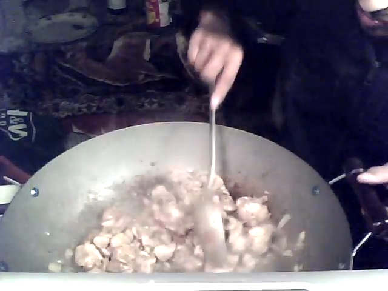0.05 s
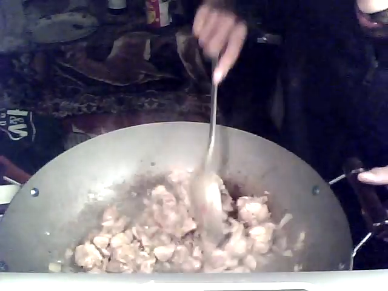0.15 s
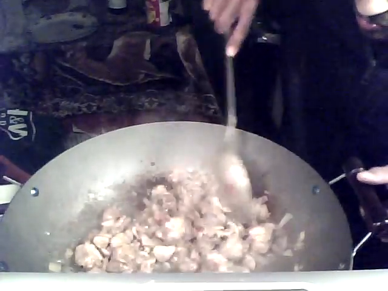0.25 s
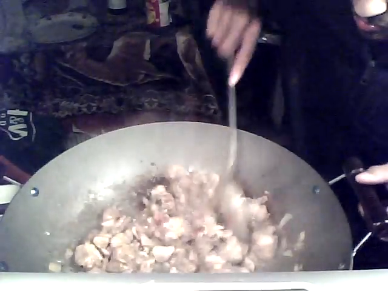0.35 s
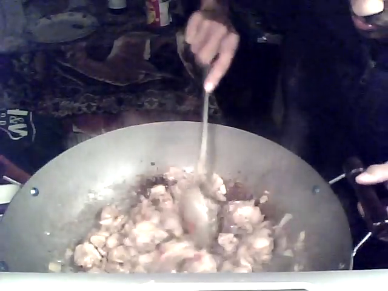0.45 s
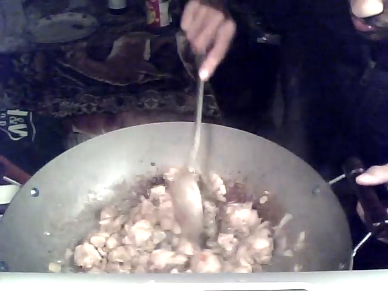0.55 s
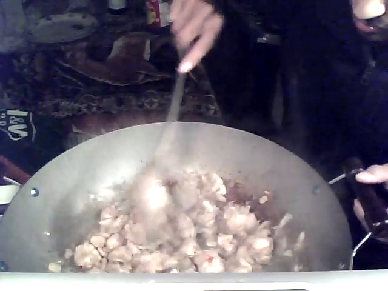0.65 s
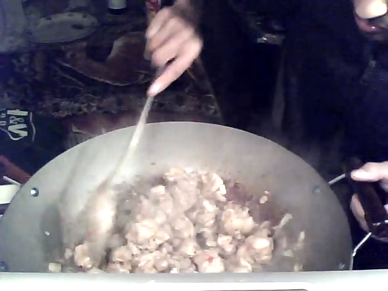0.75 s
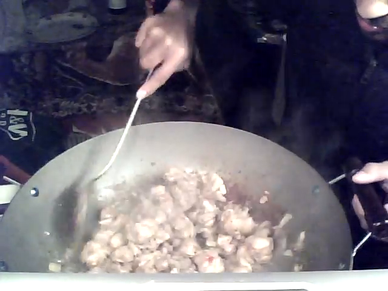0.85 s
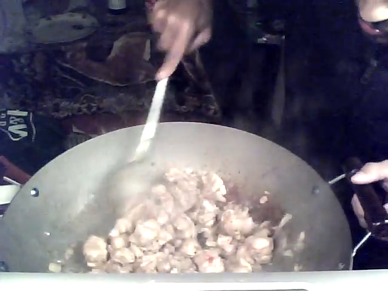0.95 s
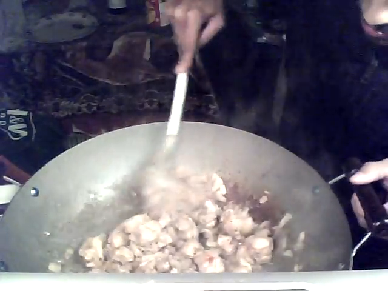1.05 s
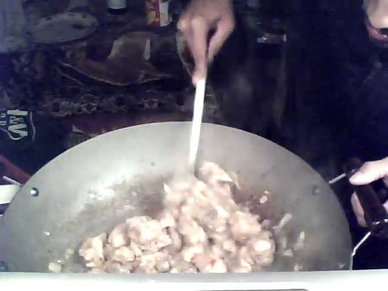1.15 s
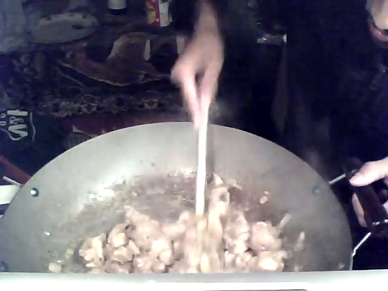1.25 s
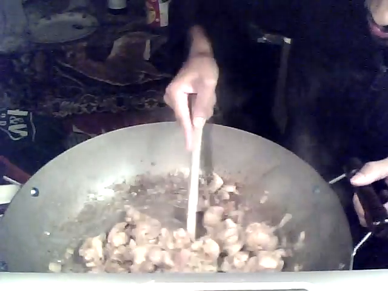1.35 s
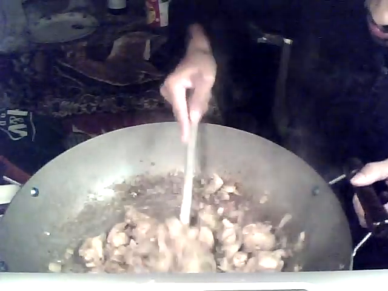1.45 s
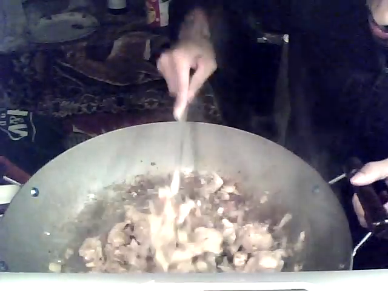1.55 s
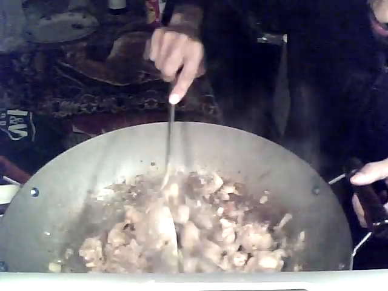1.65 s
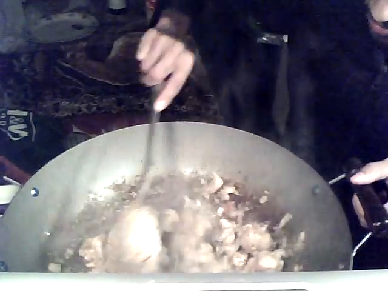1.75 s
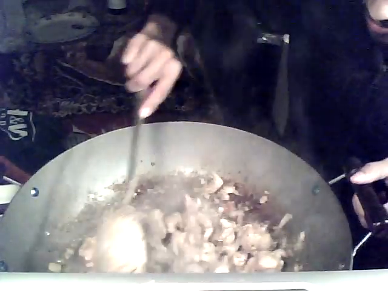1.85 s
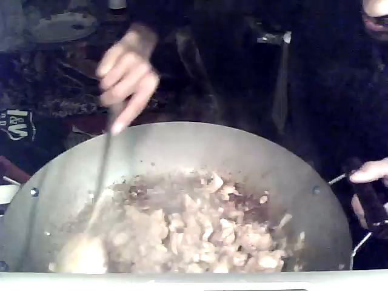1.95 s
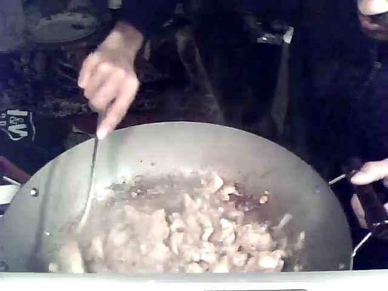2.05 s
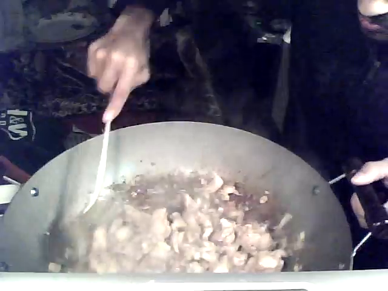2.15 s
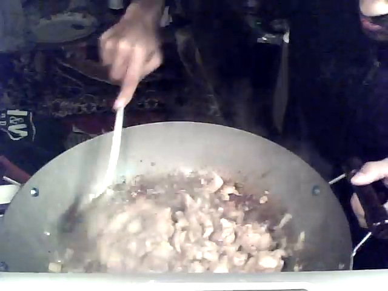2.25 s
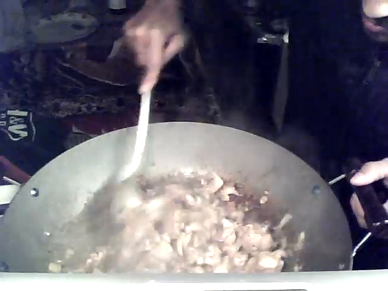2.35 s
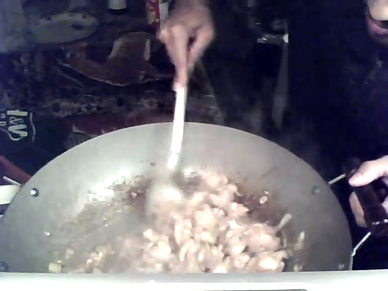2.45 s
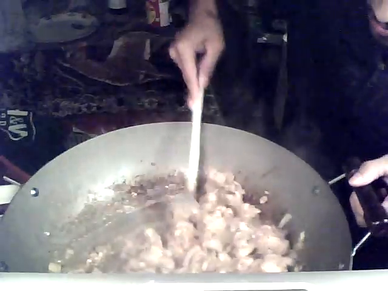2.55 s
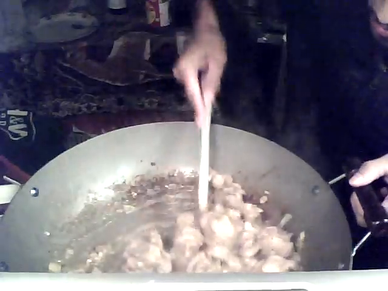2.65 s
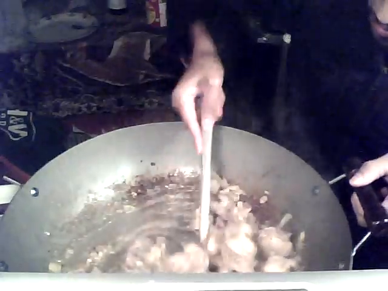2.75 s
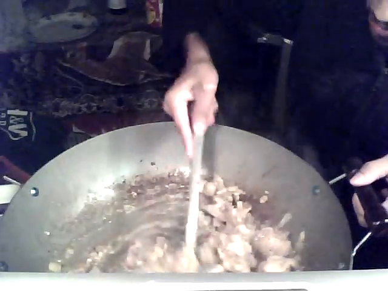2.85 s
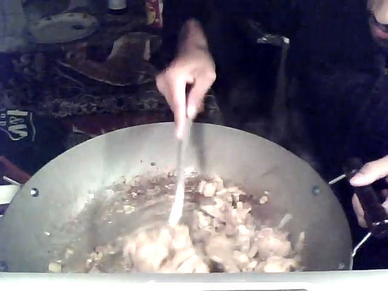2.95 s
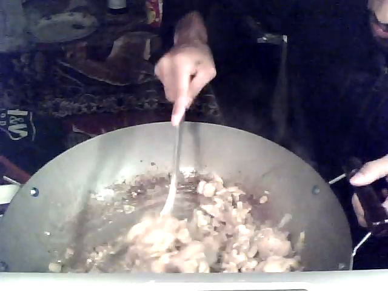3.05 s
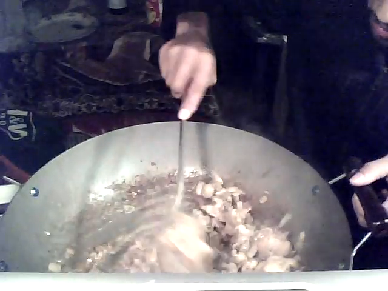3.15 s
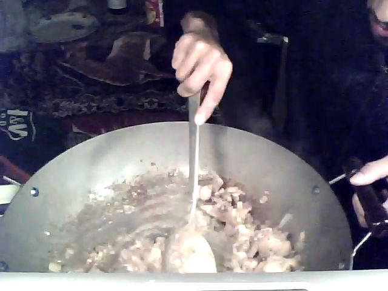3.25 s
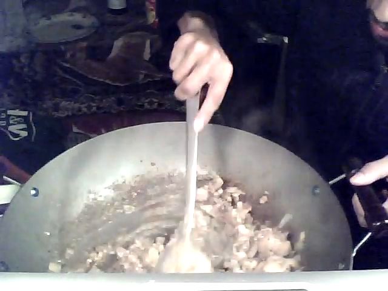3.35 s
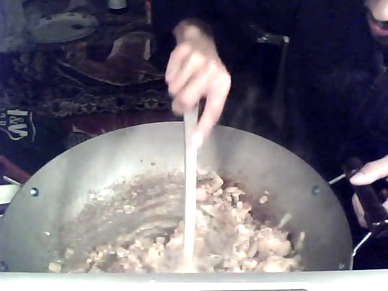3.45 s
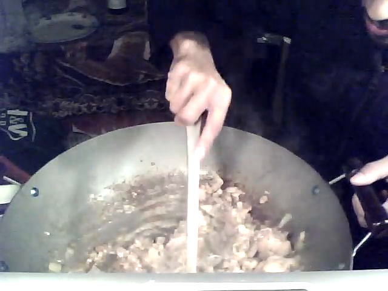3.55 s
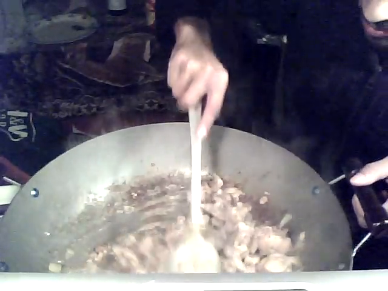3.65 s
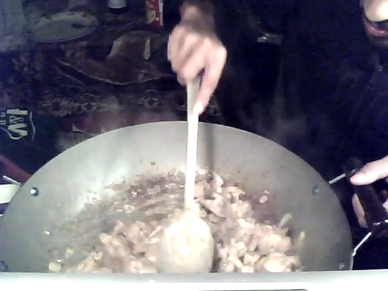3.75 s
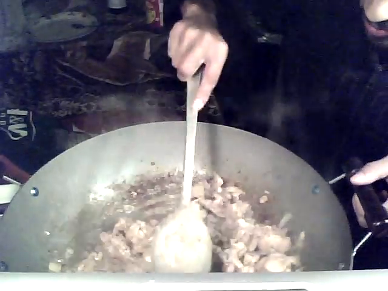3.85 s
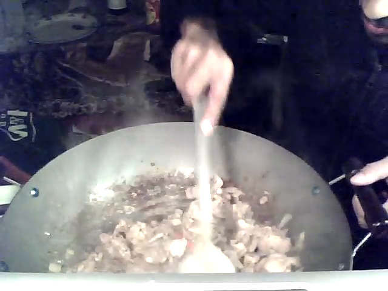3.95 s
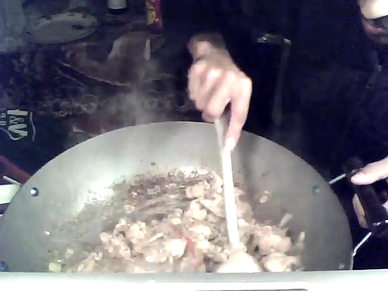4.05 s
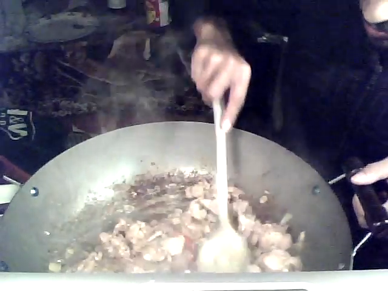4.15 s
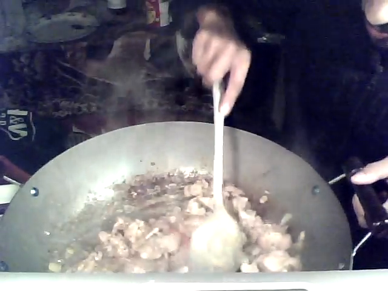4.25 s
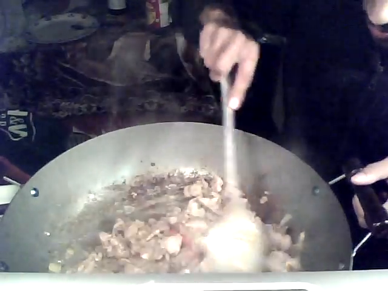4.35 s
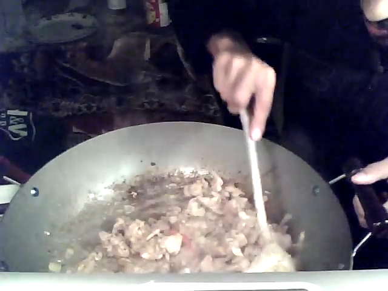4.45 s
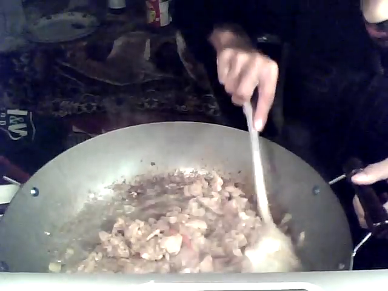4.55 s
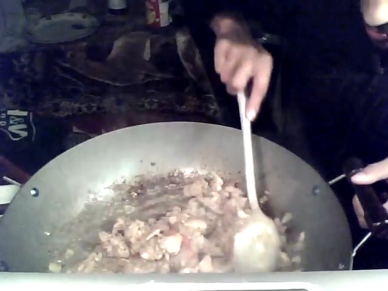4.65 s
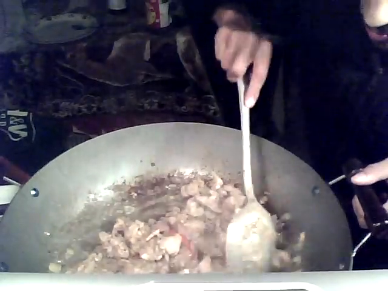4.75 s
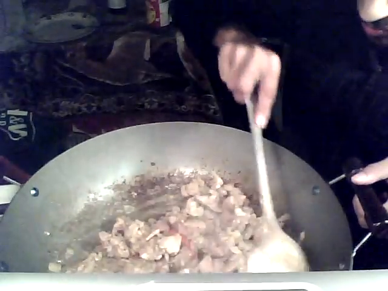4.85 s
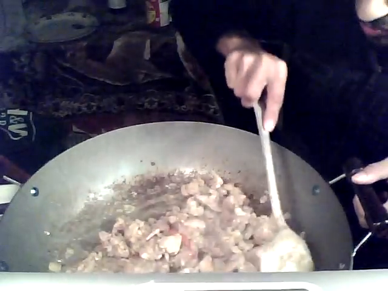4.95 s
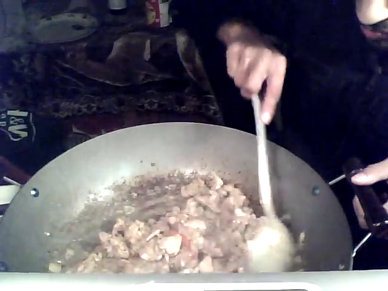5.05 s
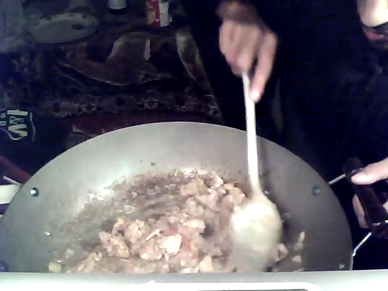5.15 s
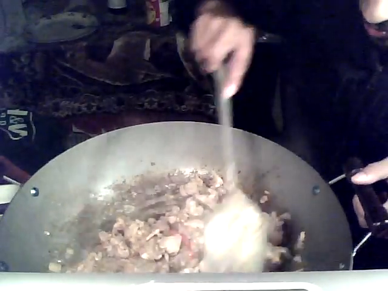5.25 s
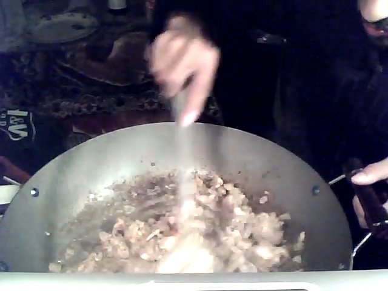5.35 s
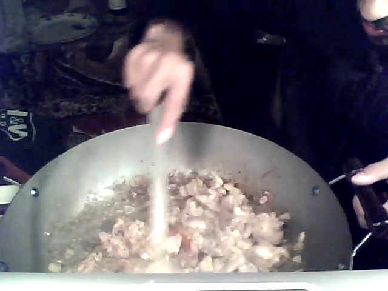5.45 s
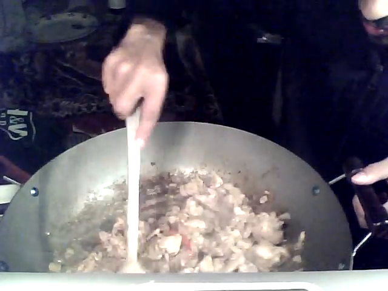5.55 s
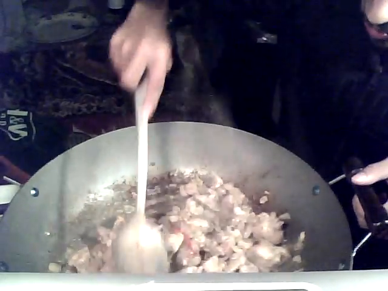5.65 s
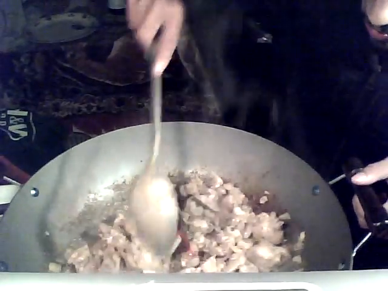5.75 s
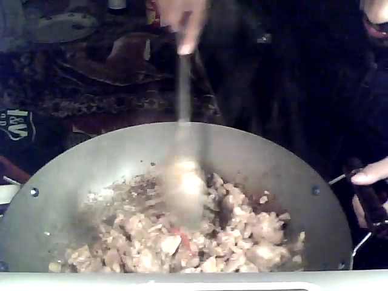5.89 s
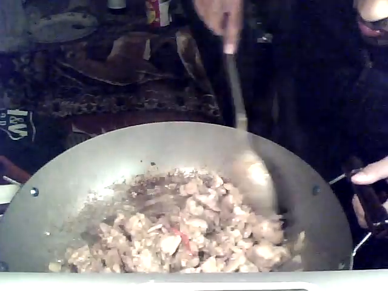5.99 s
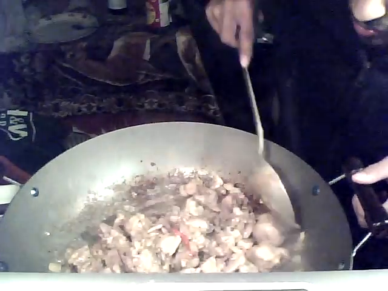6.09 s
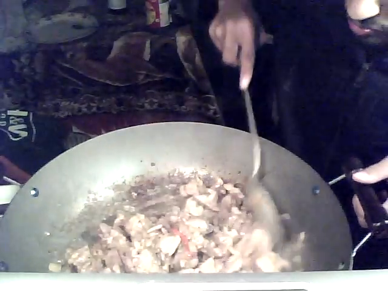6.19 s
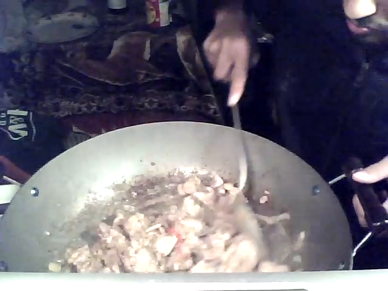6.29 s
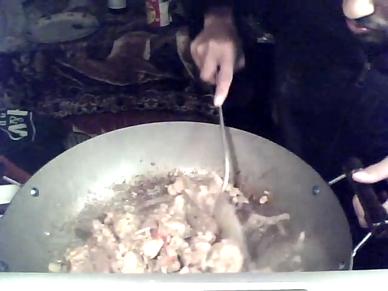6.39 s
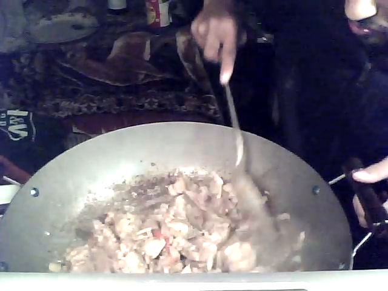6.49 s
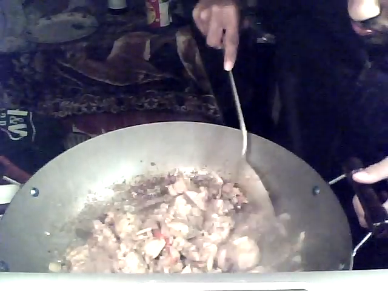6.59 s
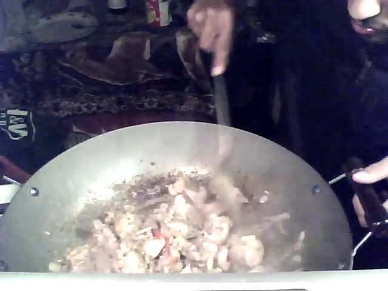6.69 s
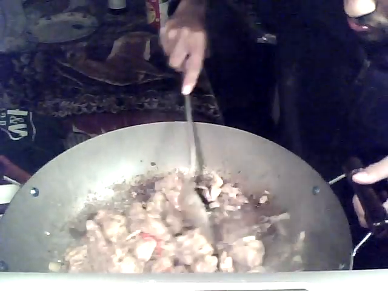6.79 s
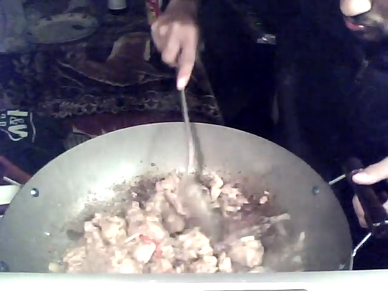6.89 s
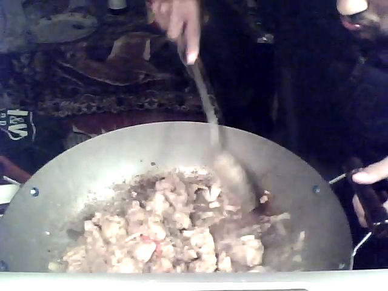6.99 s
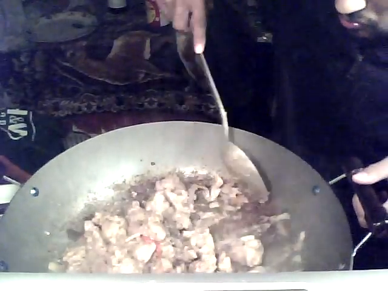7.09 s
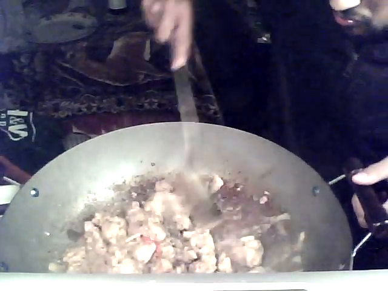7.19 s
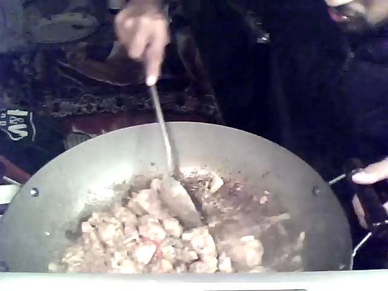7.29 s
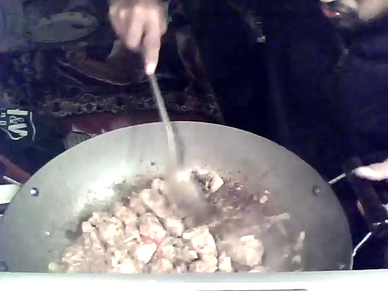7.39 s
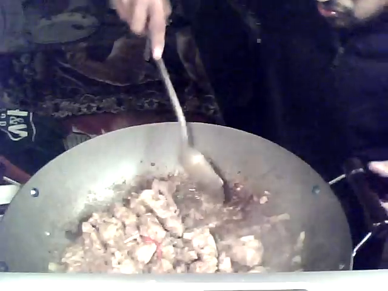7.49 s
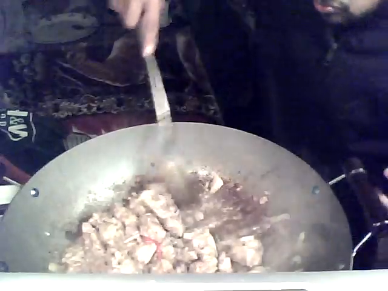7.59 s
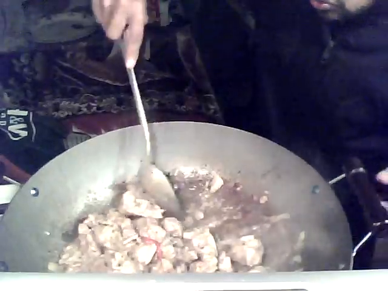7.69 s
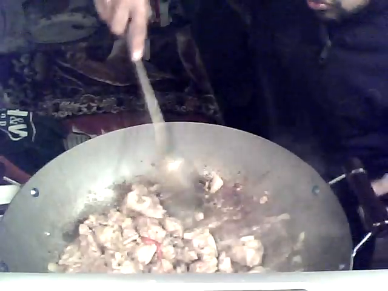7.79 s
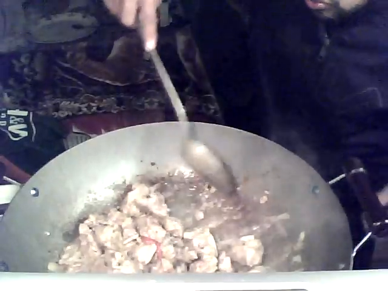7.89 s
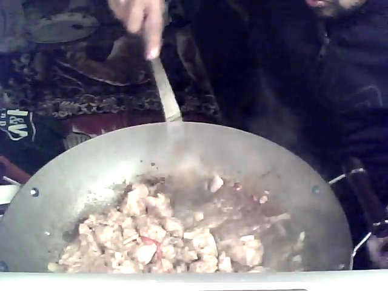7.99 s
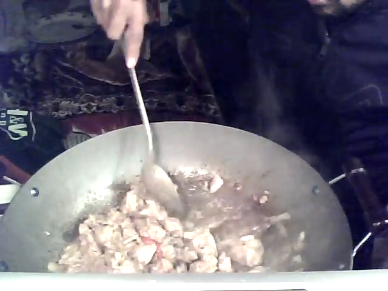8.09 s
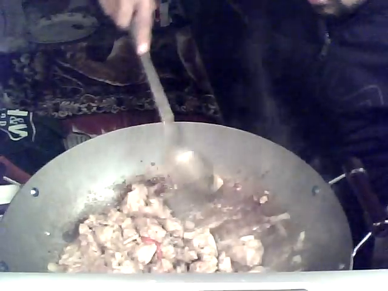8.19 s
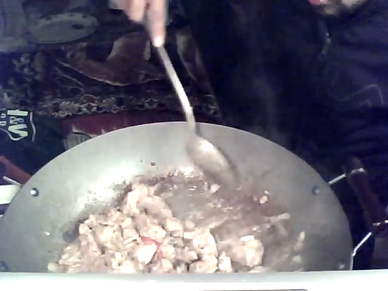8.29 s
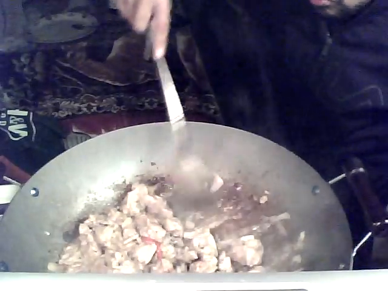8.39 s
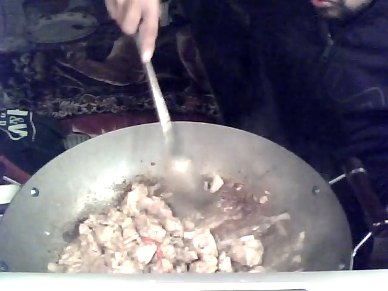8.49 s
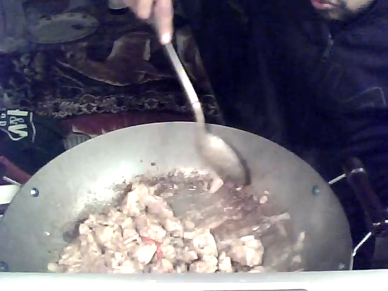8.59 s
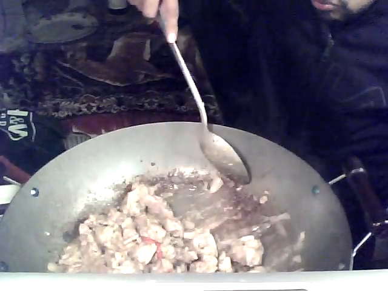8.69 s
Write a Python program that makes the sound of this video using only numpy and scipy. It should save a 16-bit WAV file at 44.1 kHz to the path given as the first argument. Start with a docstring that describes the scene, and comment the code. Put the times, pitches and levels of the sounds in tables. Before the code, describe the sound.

A metal spoon stirs meat in a steel wok. A short scrape and brief clanks with gritty strokes come first over a thin steady whine, which stops before the middle. Soft, moist pats follow, then widely spaced, very hard clangs that ring and distort. Softer pushes and a quick flurry of knocks end it. Faint sizzle comes in wisps. Short kitchen echo, dull narrow microphone.

```python
"""A metal spoon stirs meat in a steel wok, heard through a small, dull-sounding microphone in a kitchen.
A short scrape leads to clanks that ring the wok and spoon; edge catches make each stroke grate.
Up to about 3.4 s a thin whine is heard; then soft pushes pat the meat on the steel and rock the wok.
From about 4 to 6.4 s the hardest clanks come, some overloading the recorder, over wavering narrow tones.
Pushes and a last flurry of knocks follow. A noise suppressor thins the sizzle of bubbles to wisps."""
import sys
import numpy as np
from scipy import signal
from scipy.io import wavfile
from scipy.ndimage import uniform_filter1d

SR = 44100
rng = np.random.default_rng(int(sys.argv[2]) if len(sys.argv) > 2 else 0)


def transcribe(signal):
    """Save signal, clipped to [-1, 1], as a 16-bit WAV file at the path in sys.argv[1]."""
    frames = np.atleast_2d(signal).T
    limited = np.clip(frames, -1, 1)
    pcm = np.round(limited * 32767).astype(np.int16)
    wavfile.write(sys.argv[1], SR, pcm)


N = 384993
TIME = np.arange(N) / SR

# spoon landings: start_s, low_clank_peak_db, mid_ring_db (against the low clank),
# bright_ring_db (against the low clank), spoon_ring_db (against the bright ring),
# clank_centre_hz, mid_centre_hz, spoon_centre_hz
SPOON_LANDINGS = [(0.44, -20, 3, -4.5, -30, 1060, 1850, 4600),
                  (0.968, -8, -0.5, -5, -12.5, 650, 1560, 3350),
                  (0.975, -24.5, 4.5, -7.5, -19.5, 966, 2610, 3350),
                  (1.185, -21.5, 1, -12.5, -20, 563, 1750, 3000),
                  (1.217, -14, -19, -19.5, -20.5, 516, 2580, 3000),
                  (1.321, -19.5, -5, -21, -16, 1250, 1500, 3000),
                  (1.433, -32, 4, -15.5, -2, 1000, 2270, 3500),
                  (2.359, -19.5, -9.5, -7, -19, 700, 2390, 3400),
                  (2.412, -26.5, -3, -3.5, -18, 620, 2400, 3350),
                  (2.43, -19, -14.5, -7.5, -21.5, 600, 2300, 3350),
                  (2.528, -18, 0.5, -16, -6, 600, 2570, 2950),
                  (2.552, -26, 6.5, -6, -13.5, 950, 2630, 2950),
                  (3.714, -28.5, -2.5, -3, -15, 410, 2264, 3750),
                  (4.172, -4.5, -2.5, -14, -14, 1090, 1570, 3800),
                  (4.614, -10.5, -7.5, -7, -9.5, 950, 2450, 3500),
                  (5.051, -10, -10.5, -4, -3.5, 1046, 2600, 3500),
                  (5.283, -38, 5, -3.5, -15, 500, 1920, 3650),
                  (5.665, -5, -2.5, -15, -13, 1077, 1526, 3000),
                  (6.223, -33.5, 5.5, -19.5, -14.5, 1210, 1586, 3300),
                  (6.327, -7, 6, -3, -10, 1090, 1750, 3330), (6.634, -18, 5.5, -6.5, -19, 600, 2360, 3000),
                  (6.672, -34.5, 10, -1.5, -10.5, 1110, 2300, 3300),
                  (7.246, -13.5, 2, -8.5, -17, 950, 1790, 3300),
                  (7.291, -26, -12, -1, -26, 510, 1800, 4200),
                  (7.342, -23, -13.5, -10.5, -16, 506, 1800, 4200),
                  (8.143, -33, -15.5, -24.5, -16, 433, 1750, 3400),
                  (8.167, -21.5, -16.5, -18, -18.5, 493, 2450, 3400),
                  (8.179, -18.5, -7.5, -3, -31.5, 604, 2450, 3450),
                  (8.53, -17, -8, -24, -16, 560, 1735, 3000),
                  (8.551, -24, -17.5, -19.5, -12, 680, 1725, 3000),
                  (8.59, -22, 0.5, -15.5, -12, 1130, 1790, 3000),
                  (8.6, -30.5, 1.5, -5.5, -19, 1110, 1830, 3500)]
# scraping strokes: start_s, length_s, halfway_level_db, swell_over_stroke_db, bright_rasp_share_db,
# start_resonance_hz, end_resonance_hz, rocking_db (before the rumble's own level)
SCRAPING_STROKES = [(0.105, 0.041, -15, 5, -8, 2355, 1840, -35.5),
                    (0.986, 0.13, -27.5, 16.5, -2, 3446, 3300, -27.5),
                    (1.18, 0.083, -23.5, 3, -5.5, 2930, 2600, -40),
                    (1.264, 0.07, -22, 5, -15, 1007, 1310, -47),
                    (1.346, 0.064, -31, -3.5, -7, 1354, 1176, -48.5),
                    (1.434, 0.031, -30.5, 4, -5, 2077, 2300, -57),
                    (2.368, 0.07, -29, -4.5, -2, 2400, 2600, -31.5),
                    (2.452, 0.059, -38, 2.5, -9, 620, 580, -32.5),
                    (2.531, 0.12, -22, 3.5, -14.5, 587, 1160, -39.5),
                    (2.669, 0.15, -32, -5, -9, 1350, 1800, -59.5),
                    (2.829, 0.03, -26, 3, -6, 1970, 2170, -54),
                    (4.19, 0.065, -25.5, 5, -9, 1500, 550, -25.5),
                    (4.629, 0.135, -29, 16.5, -2.5, 3695, 2570, -32.5),
                    (5.081, 0.12, -25, 11.5, -2.5, 3820, 2810, -33.5),
                    (5.669, 0.048, -27, 1, -13, 1100, 1480, -29.5),
                    (6.339, 0.097, -31.5, 12, -4, 3300, 2110, -22),
                    (7.267, 0.16, -44, -0.5, -3.5, 1910, 1772, -22),
                    (8.169, 0.025, -30, -7.5, 0.5, 4400, 3500, -13)]
# soft pushes through the food: start_s, length_s, patting_db (before the level all pushes share),
# spot_resonance_hz, rocking_db (before the rumble's own level)
SOFT_PUSHES = [(0.489, 0.18, -52.5, 1395, -31), (1.559, 0.06, -58, 1420, -35.5),
               (1.885, 0.05, -62, 1437, -53.5), (2.214, 0.099, -62.5, 2520, -40),
               (3.255, 0.058, -60.5, 3390, -48), (3.391, 0.17, -57, 2750, -48.5),
               (3.578, 0.09, -54, 3440, -41.5), (3.655, 0.12, -47.5, 1215, -21.5),
               (3.782, 0.11, -47.5, 1406, -30), (3.906, 0.13, -58, 2140, -30),
               (5.369, 0.074, -50, 455, -51), (5.875, 0.13, -54.5, 3500, -63),
               (5.971, 0.033, -45.5, 2400, -72), (6.092, 0.025, -53.5, 460, -72),
               (6.284, 0.086, -44, 473, -56.5), (6.611, 0.13, -47.5, 1870, -34),
               (6.775, 0.068, -44.5, 3780, -26.5), (6.865, 0.028, -43, 1030, -30),
               (6.94, 0.068, -53.5, 992, -27), (7.155, 0.039, -78.5, 460, -26),
               (7.449, 0.12, -52.5, 1750, -29), (7.66, 0.24, -55.5, 1850, -30),
               (8.075, 0.083, -74, 464, -32.5), (8.406, 0.19, -59, 1306, -29),
               (8.57, 0.1, -43, 1400, -26.5)]
# loudness of the frying bubbles, before they waver: time_s, level_db
FRYING_LEVEL = [(0, -63.5), (0.85, -55), (1.5, -81), (2.3, -59.5), (2.998, -54.5), (3.451, -55),
                (4.899, -71), (5.4, -59.5), (5.95, -54), (6.901, -60.5), (7.1, -70), (8.73, -77)]
# resonances of the wok with food in it: pitch_hz, width_hz, gain_db
WOK_RESONANCES = [(388, 23, -16), (496, 270, 5.5), (547, 55, 7.5), (716, 50, -2), (796, 78, -6),
                  (949, 110, 6), (1056, 120, 4.5), (1192.7, 270, 1.5), (1385, 81, 2), (1628, 67, 2.5),
                  (1830, 430, 4.5), (2289, 89, 0.5), (2400, 270, -2), (2570, 180, 1.5), (2950, 99, 3),
                  (3240, 270, -0.5), (3940, 98, -17), (5000, 77, -17)]
# ringing of the spoon, before each landing's changes: pitch_hz, level_db, fade_by_60_db_s
SPOON_MODES = [(2950, -0.5, 0.11), (3243, 8, 0.14), (3430, -2, 0.24), (3350, 1.5, 0.27), (3446, -0.5, 0.28),
               (3655, -4, 0.1), (3680, -5, 0.1), (4200, -6, 0.06), (4700, -0.5, 0.07)]
# long ringing of the wok's rim, before the rim's own level: pitch_hz, level_db, fade_by_60_db_s
RIM_MODES = [(492, -9.5, 0.58), (990, -14, 0.43), (1351, -4, 0.7), (1460, -3, .8), (1750, -9, .8),
             (3741, -11, 0.6), (4016, -9, 0.6), (2200, -6.5, 0.45), (2650, -11, 0.37)]
# wok and stand swaying together: pitch_hz, width_hz, gain_db
STAND_SWAY = [(85.2, 5.1, 5.5), (124.3, 1.8, -2.5), (144.4, 1.4, -3.5)]
# the stand's slow, deep sway: pitch_hz, width_hz, gain_db
STAND_DEEP_SWAY = [(23, 9, 1.5), (47.3, 4.9, -1)]
# narrow tones between the hardest strokes, before their shared level: pitch_hz, level_db
LINGERING_TONES = [(457.6, -54), (995.9, -64), (1351, -64), (1480, -77), (1750, -64), (1992, -66.5),
                   (2191, -69), (2428, -79.5), (2584, -80)]
# bright resonances through which the bubbles are heard: pitch_hz, width_hz, gain_db
BUBBLE_RESONANCES = [(3046, 120, 16), (3340, 50, 17.5), (3340, 39, 13), (3770, 45, 20.5), (4070, 25, 24),
                     (4300, 50, 15), (4690, 46, 22.5)]
# loudness of the thin whine: time_s, level_db
WHINE_LEVEL = [(0, -63), (0.5, -75), (1.6, -49), (2.302, -53), (3.3, -44.5)]
# how long kitchen echoes last, before random scatter: pitch_hz, fade_by_60_db_s
KITCHEN_DECAY = [(200, 0.45), (530, 0.3), (1400, 0.24), (3700, 0.19), (6000, 0.35)]

BOWL_LOW_HZ = 370  # clanks and scrapes hold little below this
BAND_EDGES_HZ = (1400, 2900)  # borders between low, mid and bright ring
MID_WIDTH, MID_FOCUS_DB = 0.12, 6.5  # each landing favours one part of the mid ring
SPOON_FOCUS_HZ, SPOON_FOCUS_DB = 166, 7  # and the spoon's modes near one pitch
BITE_S, LIFT_DB_PER_S = 0.008, 452.5  # the edge bites at once and lifts off quickly
RASP_HZ = 2200  # the bright rasp lies above this
DULLING_DB = 1  # the rasp's share falls by this over a stroke, as food gathers at the edge
JUDDER_DB, JUDDER_HZ = 0.3, 45  # the edge presses unevenly as it skids
SHOVE_S, PUSH_FALL_DB_PER_S = 0.042, 229.5  # a push builds up and lets go softly
PAT_LOW_HZ = 800  # soft meat hardly wakes the lowest modes of the bowl
PAT_SWELL_DB = -8  # the meat moves most at the start of a push
WET_DB, WET_HZ = -5, 3300  # the moist meat adds a bright crackle to its pats
# the wok starts to rock under a stroke, then settles
ROCK_RISE_S, ROCK_SWELL_DB, SETTLE_DB_PER_S = 0.022, -11.5, 88
LINGER_START_S, LINGER_LENGTH_S = 3.8, 2.55
WHINE_HZ, WHINE_SAG_HZ_PER_S, WHINE_STOP_S = 888, 2.5, 3.38
CUT_HZ = 12800  # top of the finished sound


def knocks(contact_s=0.0018, reflection_s=0.0018, reflection=0.64, shell_t60=0.08, crest_db=7):
    """The spoon lands with one early reflection from the stove top; wok and spoon ring, coloured by the spot."""
    out = np.zeros(N)
    t = np.arange(SR // 3) / SR
    for (s, low_db, mid_db, bright_db, spoon_db,
         clank_hz, mid_hz, spoon_hz) in SPOON_LANDINGS:
        blow = shell(t, shell_t60)
        add(blow, 0, np.ones(1))
        add(blow, reflection_s, np.array([reflection]))
        clank = band(resonate(blow, WOK_RESONANCES), BOWL_LOW_HZ, "highpass")
        low = band(clank, BAND_EDGES_HZ[0], "lowpass", order=6)
        low = resonate(low, [(clank_hz, clank_hz, 0)])  # as wide as its centre is high
        mid = band(clank, BAND_EDGES_HZ, "bandpass")
        mid += resonate(mid, [(mid_hz, MID_WIDTH * mid_hz, MID_FOCUS_DB)])
        bright = band(clank, BAND_EDGES_HZ[1], "highpass", order=6)
        sound = amp(bright_db + spoon_db) * spoon(t, spoon_hz)
        for part, db in ((low, 0), (mid, mid_db), (bright, bright_db)):
            first_10_ms = part[:SR // 100]
            sound += amp(db - crest_db) * part / np.std(first_10_ms)
        add(out, s + contact_s, amp(low_db) * sound)
    return out


def spoon(t, centre_hz, uneven_db=2.5, detune=0.0017):
    """The grip and the spot of contact favour some of the spoon's modes and detune them anew each time."""
    chance = rng.standard_normal((len(SPOON_MODES), 2))
    modes = []
    for (hz, db, t60), (pitch_luck, level_luck) in zip(SPOON_MODES, chance):
        off_centre_db = SPOON_FOCUS_DB * np.tanh(abs(hz - centre_hz) / SPOON_FOCUS_HZ)
        modes.append((hz * (1 + detune * pitch_luck), db + uneven_db * level_luck - off_centre_db, t60))
    return ring(modes, t)


def shell(t, t60):
    """The crowd of thin-steel modes: a dense dying response of energy 1."""
    dense = rng.standard_normal(len(t)) * amp(-60 * t / t60)
    return dense / np.linalg.norm(dense)


def scrapes(per_s=3000, spread_db=2.0, shell_t60=0.064, shell_db=-5):
    """The spoon's edge catches and slips on the steel; each stroke meets another part of the bowl."""
    out = np.zeros(N)
    t = np.arange(SR // 5) / SR
    judder = unit(band(rng.standard_normal(N), JUDDER_HZ, "lowpass", order=2))
    pressure = amp(JUDDER_DB * judder)
    catches = slips(per_s, spread_db)
    catches *= pressure / np.sqrt(uniform_filter1d(catches ** 2, size=1500) + 1e-3)
    for start, length, db, swell_db, share_db, from_hz, to_hz, _ in SCRAPING_STROKES:
        span = (TIME > start - 0.02) & (TIME < start + length + 0.1)
        touch = amp(shell_db) * shell(t, shell_t60) + (t == 0)
        body = band(resonate(touch, WOK_RESONANCES), BOWL_LOW_HZ, "highpass", order=8)
        ends = np.array([start, start + length]) - TIME[span][0]
        grating = skid(through(catches[span], body), ends, [from_hz, to_hz])
        shares_db = [share_db + DULLING_DB / 2, share_db - DULLING_DB / 2]
        grating = tilted(grating, ends, shares_db)
        stroke = gesture(start, length, BITE_S, swell_db, LIFT_DB_PER_S)[span]
        out[span] += amp(db) * stroke * steady(grating, size=500)
    return out


def skid(x, s, spot_hz, width=0.082, spot_db=7):
    """The edge slides over the bowl, so the resonance that it wakes most glides."""
    hz, t, z = signal.stft(x, SR, nperseg=512)
    centre = np.interp(t, s, spot_hz)
    distance = (hz[:, None] - centre) / (width * centre)
    lift = 1 + amp(spot_db) / (1 + distance ** 2)
    return signal.istft(z * lift, SR, nperseg=512)[1][:len(x)]


def tilted(x, s, share_db, top_hz=3600, wander_db=3.0):
    """Tilts the mix of low and high pitches over time to bring the bright rasp near its given share."""
    hz, t, z = signal.stft(x, SR, nperseg=512)
    z = wander(z, wander_db, size=10)  # the moving contact wakes ever other modes
    # try 33 tilts, from dull to bright, and pick the nearest for each moment
    tilts_db = np.linspace(-40, 24, 33)[:, None]
    slopes = amp(tilts_db * np.minimum(hz / top_hz, 1))
    power = slopes ** 2 * np.mean(abs(z) ** 2, axis=1)
    shares_db = 10 * np.log10(power[:, hz > RASP_HZ].sum(1) / power.sum(1))
    slopes /= np.sqrt(power.sum(1))[:, None]
    wanted_db = np.interp(t, s, share_db)
    choice = abs(shares_db[:, None] - wanted_db).argmin(0)
    return unit(signal.istft(z * slopes[choice].T, SR, nperseg=512)[1][:len(x)])


def pushes(per_s=500, spread_db=1.5, push_db=-1, spot_width=0.11, spot_db=10, patchy_db=5):
    """Pieces of meat tumble and pat against the bowl, waking the resonance of that spot."""
    pats = patter(per_s, spread_db, patchy_db)
    out = np.zeros(N)
    for start, length, db, spot_hz, _ in SOFT_PUSHES:
        span = (TIME > start) & (TIME < start + length + 0.2)
        spot = resonate(pats[span], [(spot_hz, spot_width * spot_hz, spot_db)])
        patting = unit(pats[span] + spot)
        push = gesture(start, length, SHOVE_S, PAT_SWELL_DB, PUSH_FALL_DB_PER_S)[span]
        out[span] += amp(db + push_db) * push * patting
    return out


def patter(per_s, spread_db, patchy_db):
    """Pieces of moist meat pat against the bowl: dull wok resonances plus a bright, wet crackle."""
    hits = slips(per_s, spread_db)
    dull = band(resonate(hits, WOK_RESONANCES), PAT_LOW_HZ, "highpass", order=3)
    wet = amp(WET_DB) * band(hits, WET_HZ, "highpass")
    return wavering(dull + wet, patchy_db, size=8)


def rim(steel, rim_db=-71):
    """The wok's rim answers every sound of the steel with a faint, long ringing."""
    return amp(rim_db) * through(steel, ring(RIM_MODES, TIME[:SR]))


def rumble(rumble_db=-1, broad_db=-25, top_hz=165, deep_db=-4, deep_lag_s=0.09):
    """Stirring jolts the wok; the stand sways in a few low modes, the deepest slow to start and settle."""
    jolts = band(rng.standard_normal(N), 90, "highpass")
    sway = resonate(jolts, STAND_SWAY) + amp(broad_db) * jolts
    sway = band(sway, top_hz, "lowpass", order=5)
    deep = band(resonate(rng.standard_normal(N), STAND_DEEP_SWAY), 66, "lowpass")
    drive = rocking()
    keep = np.exp(-1 / (deep_lag_s * SR))
    lagging = signal.lfilter([1 - keep], [1, -keep], drive)
    swaying = amp(rumble_db) * steady(sway, size=2200) * drive
    return swaying + amp(deep_db) * steady(deep, size=5000) * lagging


def rocking():
    """How hard the wok rocks: every stroke and every push sets it going."""
    scraped = sum(amp(db) * gesture(start, length, ROCK_RISE_S, ROCK_SWELL_DB, SETTLE_DB_PER_S)
                  for start, length, *_, db in SCRAPING_STROKES)
    pushed = sum(amp(db) * gesture(start, length, SHOVE_S, 0, PUSH_FALL_DB_PER_S)
                 for start, length, *_, db in SOFT_PUSHES)
    return np.hypot(scraped, pushed)


def lingering(linger_db=1, width_hz=20, waver_db=7.0, rise_s=0.067, swell_db=4, fall_db_per_s=80):
    """While the stirring is at its hardest, a few narrow tones of the bowl waver on."""
    stir = rng.standard_normal(N)
    tones = np.zeros(N)
    for hz, db in LINGERING_TONES:
        peak = [(hz, width_hz, 0)]
        tones += amp(db) * unit(resonate(resonate(stir, peak), peak))  # twice, for a narrower tone
    swell = gesture(LINGER_START_S, LINGER_LENGTH_S, rise_s, swell_db, fall_db_per_s)
    return amp(linger_db) * wavering(tones, waver_db, size=7) * swell


def sizzle(per_s=600, spread_db=1.0, low_hz=2200, high_hz=4600, steam_db=-69, patchy_db=5.5):
    """Tiny bubbles burst under the meat, swelling and fading in patches, over a low wash of steam."""
    bursts = band(slips(per_s, spread_db), (low_hz, high_hz), "bandpass", order=2)
    fizz = unit(bursts + resonate(bursts, BUBBLE_RESONANCES))
    fizz *= level(*np.transpose(FRYING_LEVEL))
    steam = amp(steam_db) * unit(band(rng.standard_normal(N), (350, 2200), "bandpass", order=2))
    return wavering(fizz + steam, patchy_db, size=10)


def whine():
    """One thin tone whose pitch sags a little and which stops part-way."""
    s, db = np.transpose(WHINE_LEVEL)
    pitch_hz = WHINE_HZ - WHINE_SAG_HZ_PER_S * TIME
    tone = unit(np.sin(2 * np.pi * np.cumsum(pitch_hz) / SR))
    return tone * level(np.r_[s, WHINE_STOP_S], np.r_[db, db[-1]])


def kitchen(x, room_db=-14, build_s=0.00065, uneven_db=3.5, scatter=0.62):
    """Room echoes that build up quickly and thin out, as each pitch dies away at its own pace."""
    hz, t, z = signal.stft(rng.standard_normal(SR), SR, nperseg=1024)
    luck = np.clip(rng.standard_normal(len(hz)), -2, 2)
    t60 = np.interp(hz, *np.transpose(KITCHEN_DECAY)) * np.exp(scatter * luck)
    tail = signal.istft(z * amp(-60 * t / t60[:, None]), SR, nperseg=1024)[1]
    tail *= 1 - np.exp(-np.arange(len(tail)) / SR / build_s)
    echoes = through(x, tail / np.linalg.norm(tail))
    return amp(room_db) * wavering(echoes, uneven_db, size=12)


def air(air_db=-76):
    """A very faint, dull hiss: noise that weakens gently above 150 Hz."""
    return amp(air_db) * unit(band(rng.standard_normal(N), 150, "lowpass", order=1))


def suppress(x, threshold_db=-73, slope_db=0.5, depth_db=-28):
    """Noise suppressor: turns down pitches whose recent power is under a limit that rises per octave."""
    hz, t, z = signal.stft(x, SR, nperseg=1024, noverlap=768)
    power = uniform_filter1d(abs(z) ** 2, size=2, axis=0)
    recent = signal.lfilter([0.2], [1, -0.8], power)
    limit_db = threshold_db + slope_db * np.log2(np.maximum(hz, 500) / 2000)
    recent_db = 10 * np.log10(abs(recent) + 1e-16)
    shut = 0.5 - 0.5 * np.tanh(recent_db - limit_db[:, None])
    shut = uniform_filter1d(shut, size=11, axis=1)  # the gains glide instead of switching
    return signal.istft(z * amp(depth_db * shut), SR, nperseg=1024, noverlap=768)[1][:, :N]


def gesture(start, length, rise_s, swell_db, fall_db_per_s):
    """Gain of one movement of the hand: it rises, swells or sags while it lasts, and dies away."""
    t = TIME[TIME >= start] - start
    swell = swell_db * (np.minimum(t / length, 1) - 0.5)
    db = swell - fall_db_per_s * np.maximum(t - length, 0)
    gain = np.minimum(t / rise_s, 1) * amp(np.maximum(db, -200))
    return np.r_[np.zeros(N - len(t)), gain]


def slips(per_s, spread_db):
    """Random train of tiny catches of uneven size, scaled to rms 1."""
    size = amp(spread_db * np.minimum(rng.exponential(1, N), 4))
    sign = rng.choice([-1, 1], N)
    return unit(size * sign * (rng.random(N) < per_s / SR))


def wavering(x, depth_db, size=3):
    """Lets the resonances of a sound swell and fade in patches."""
    z = wander(signal.stft(x, SR, nperseg=1024)[2], depth_db, size=size)
    return signal.istft(z, SR, nperseg=1024)[1][:len(x)]


def wander(z, depth_db, size=3):
    """Raises and lowers short-time spectra z in random patches, smoothed over size pitch steps."""
    patches = uniform_filter1d(rng.standard_normal(z.shape), size=size, axis=0)
    patches = uniform_filter1d(patches, size=2, axis=1)  # over two moments
    return z * amp(depth_db * unit(patches))


def ring(modes, t):
    """Dying sines of a struck object."""
    return sum(amp(db - 60 * t / t60) * np.sin(2 * np.pi * hz * t) for hz, db, t60 in modes)


def resonate(x, peaks):
    """Sums band-pass resonances, each with its own peak gain."""
    return sum(amp(db) * signal.lfilter(*signal.iirpeak(hz, hz / width, SR), x)
               for hz, width, db in peaks)


def band(x, hz, kind, order=4):
    """Butterworth filter: keeps one range of pitches."""
    return signal.sosfilt(signal.butter(order, hz, kind, fs=SR, output="sos"), x)


def through(x, response):
    """Lets x excite an impulse response."""
    return signal.fftconvolve(x, response)[:len(x)]


def steady(x, size):
    """Holds the level of x even over size samples."""
    return x / np.sqrt(abs(uniform_filter1d(x ** 2, size)) + 1e-12)


def level(s, db):
    """Gain along a dB curve, silent outside it."""
    return uniform_filter1d(amp(np.interp(TIME, s, db, left=-200, right=-200)), size=130)


def add(mix, s, sound):
    """Mixes a sound in at time s."""
    part = mix[max(round(s * SR), 0):][:len(sound)]
    part += sound[:len(part)]


def unit(x):
    """Scales to rms 1."""
    return x / np.sqrt(np.mean(x ** 2) + 1e-20)


def amp(db):
    """Decibels to gain."""
    return 10 ** (np.asarray(db) / 20)


def scene():
    """Spoon on steel, with the rim and the room answering, over rumble, frying and faint tones."""
    steel = knocks() + scrapes() + pushes()
    answers = rim(steel) + kitchen(steel)
    background = rumble() + lingering() + sizzle() + whine() + air()
    return (steel + answers + background)[None]


def record(dry, voice_band_hz=5000, ceiling=0.95):
    """A narrow-band microphone whose output clips on the hardest clanks, after noise suppression."""
    narrow = suppress(band(dry, voice_band_hz, "lowpass", order=16))
    clipped = np.clip(narrow, -ceiling, ceiling)
    smoothing = signal.firwin(255, CUT_HZ, window=("kaiser", 8), fs=SR)
    return signal.oaconvolve(clipped, smoothing[None], "same")


dry = scene()
out = record(dry)
transcribe(out)
```